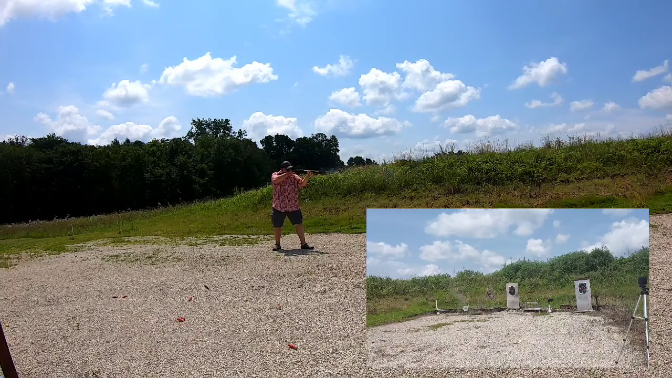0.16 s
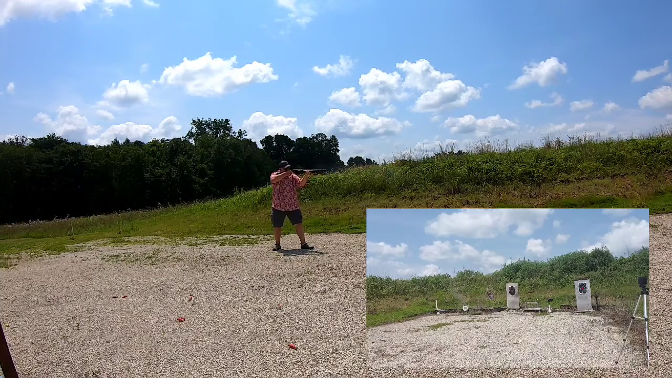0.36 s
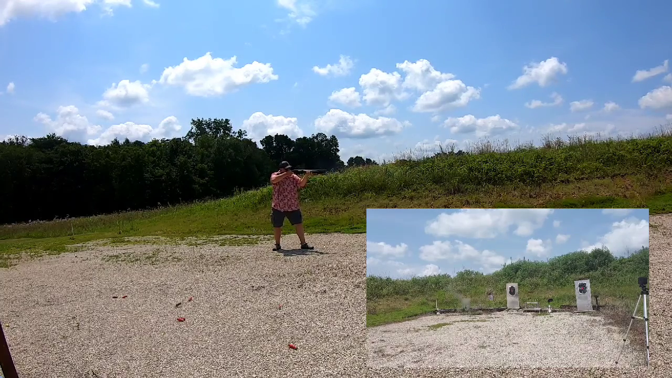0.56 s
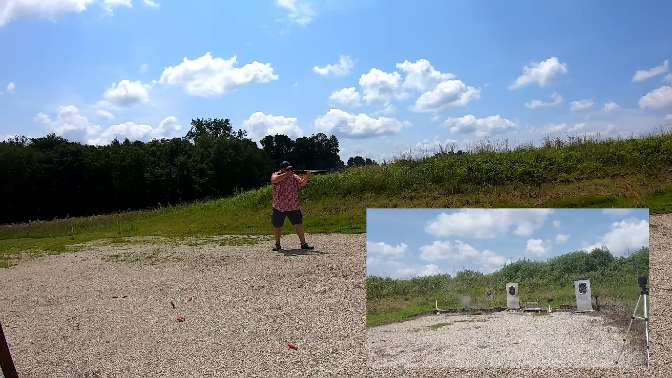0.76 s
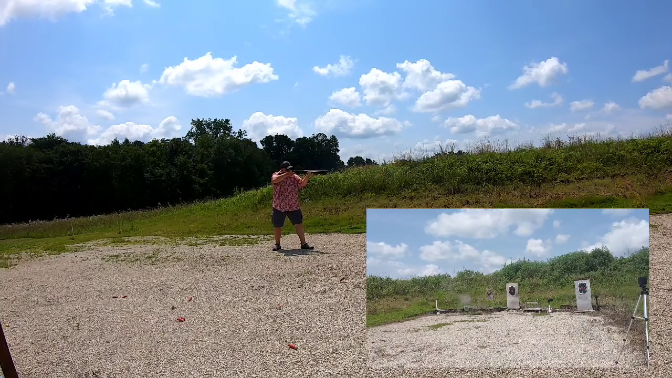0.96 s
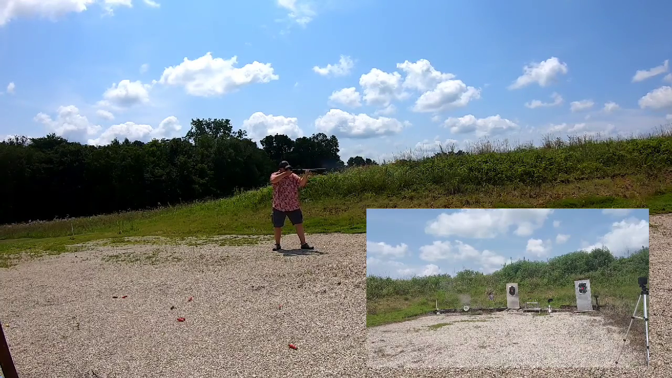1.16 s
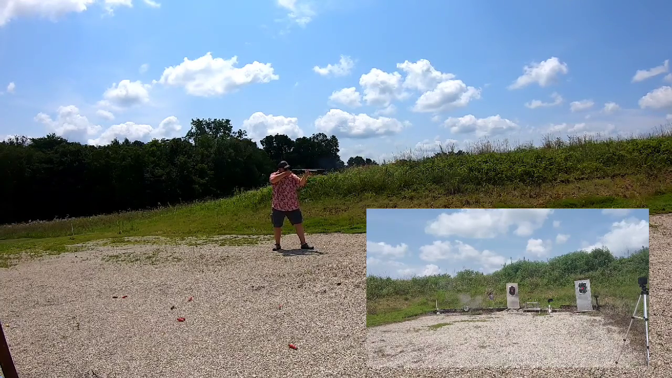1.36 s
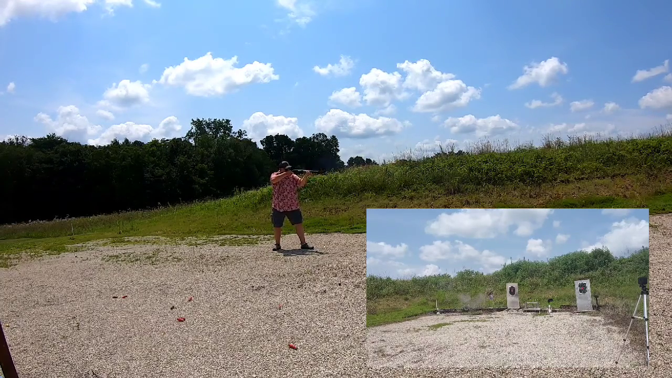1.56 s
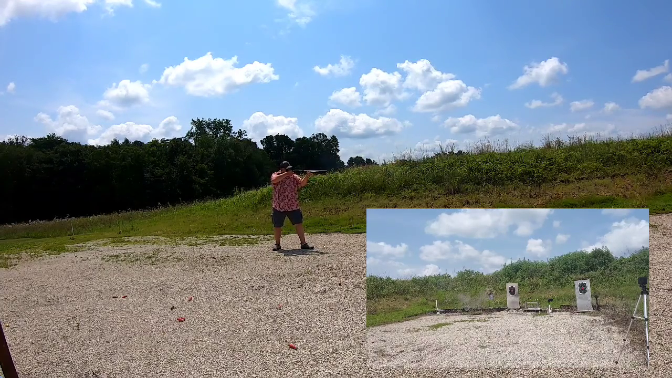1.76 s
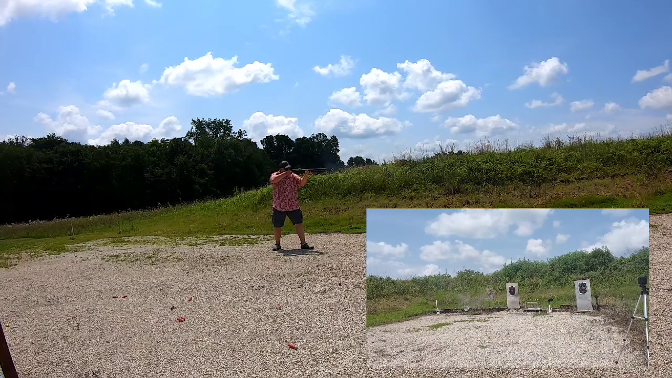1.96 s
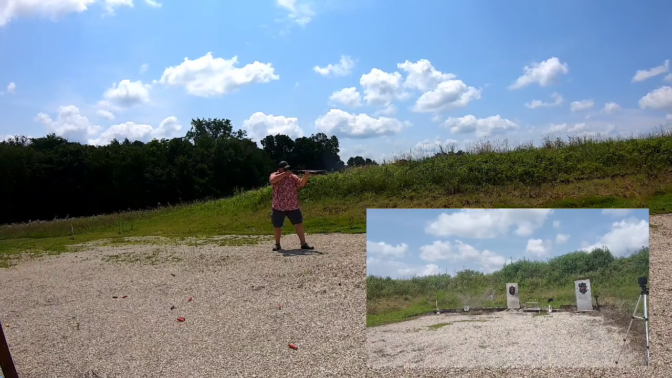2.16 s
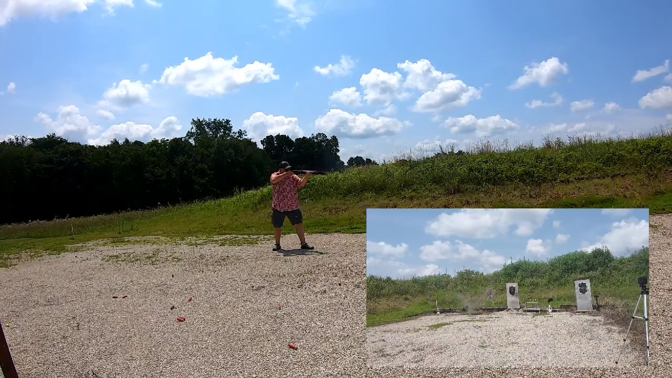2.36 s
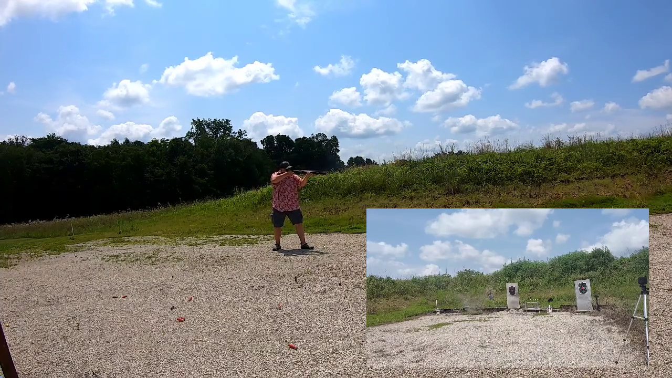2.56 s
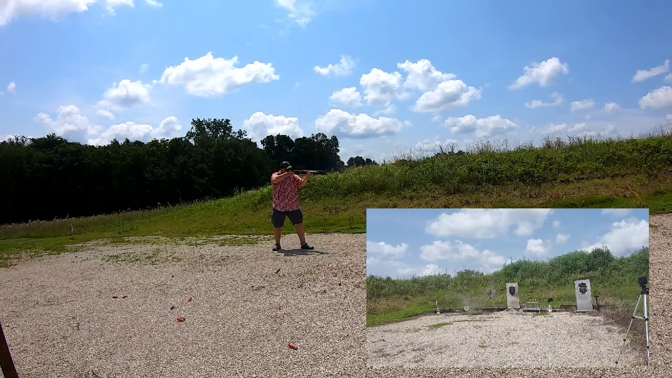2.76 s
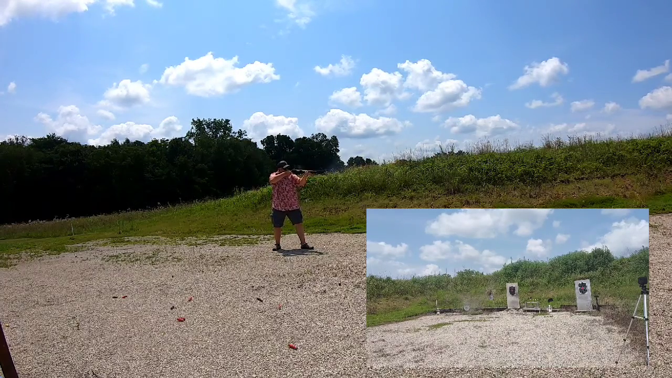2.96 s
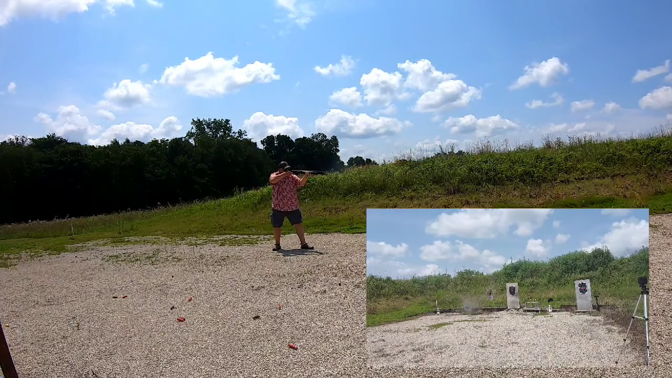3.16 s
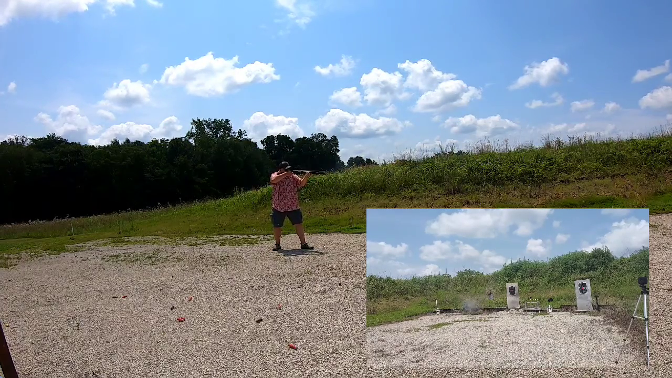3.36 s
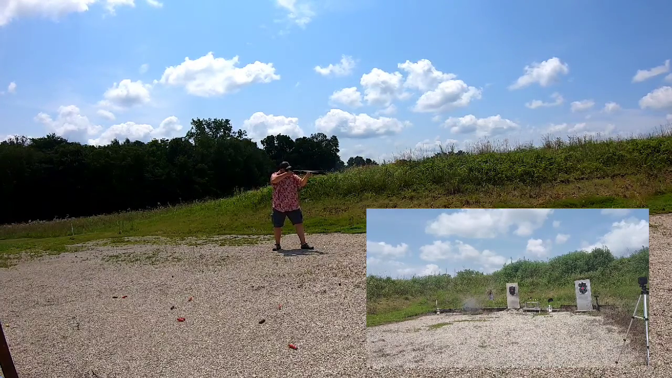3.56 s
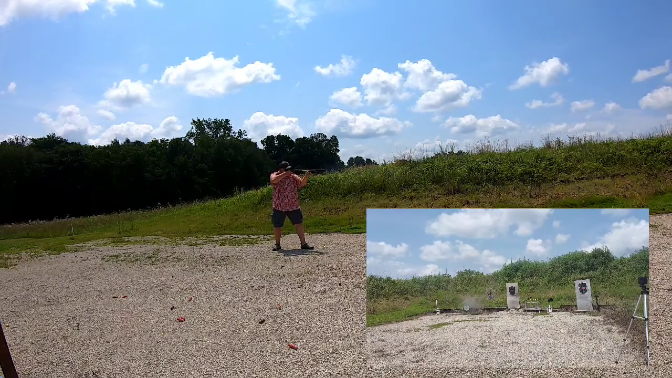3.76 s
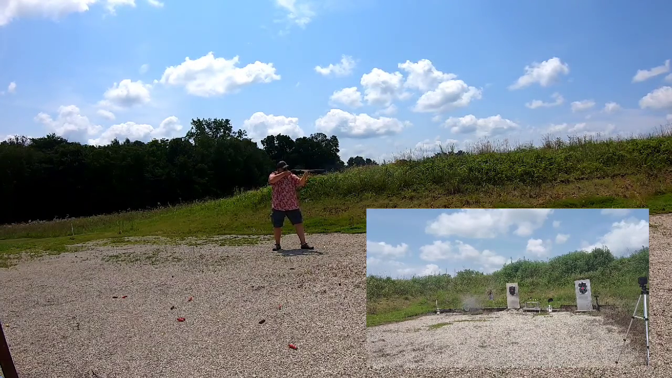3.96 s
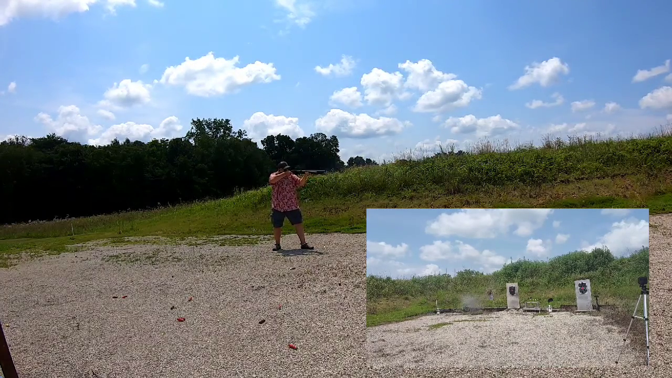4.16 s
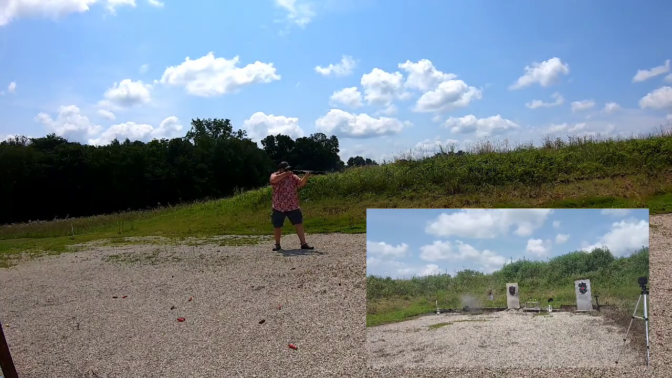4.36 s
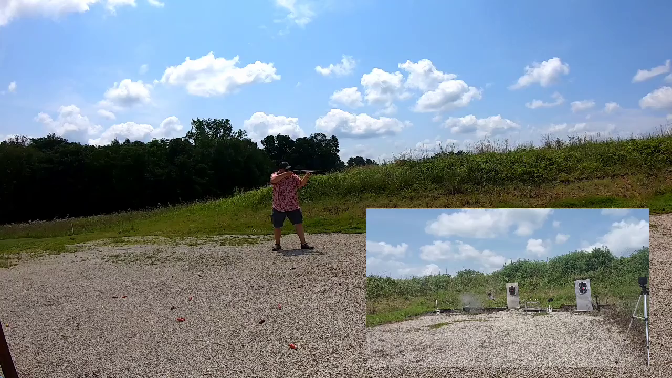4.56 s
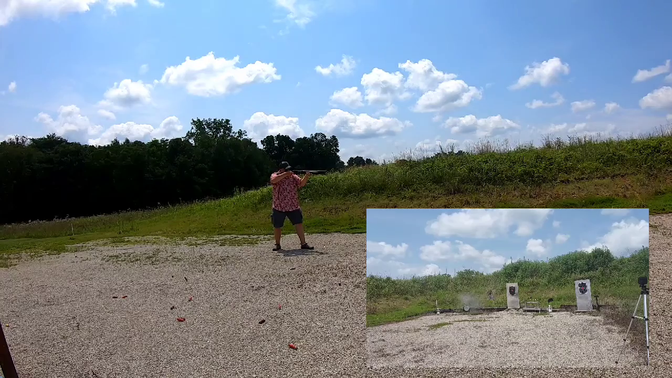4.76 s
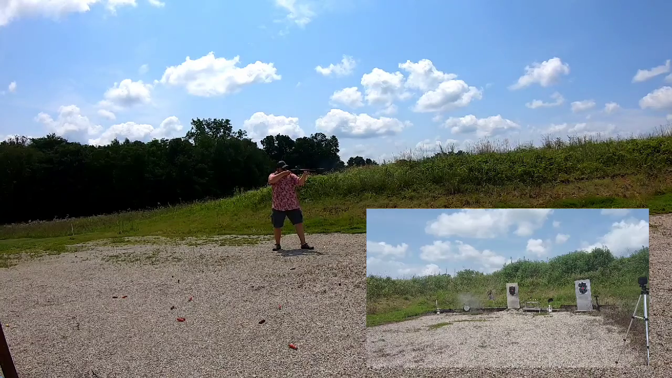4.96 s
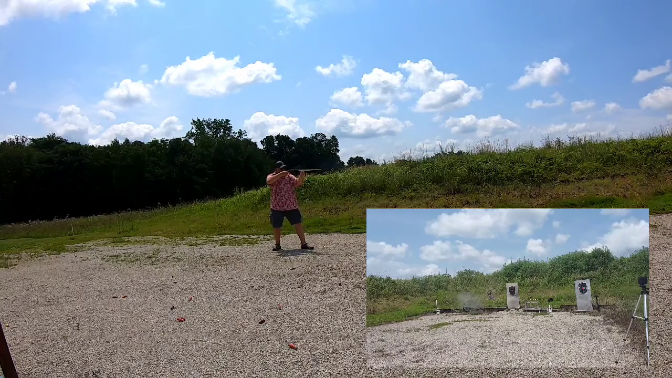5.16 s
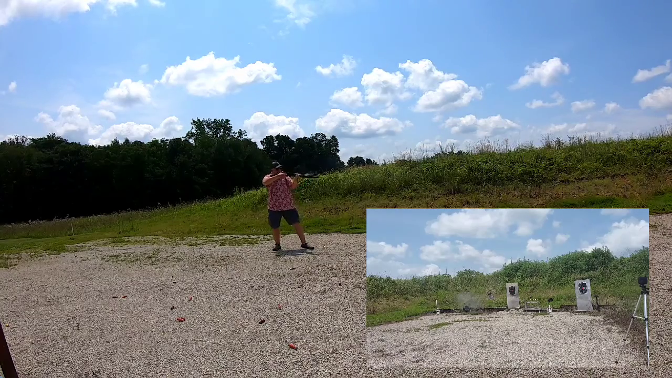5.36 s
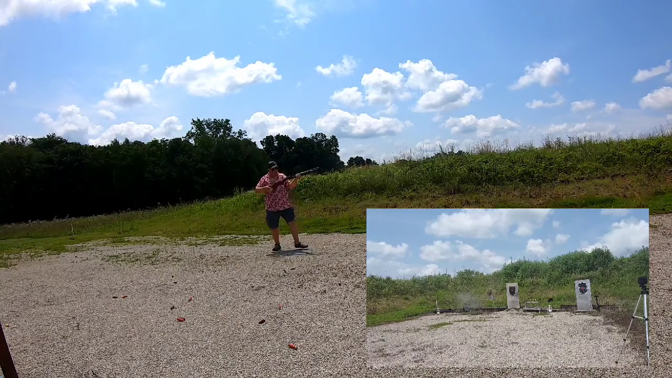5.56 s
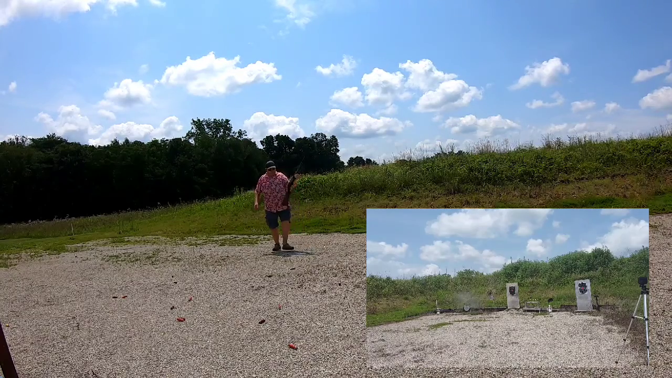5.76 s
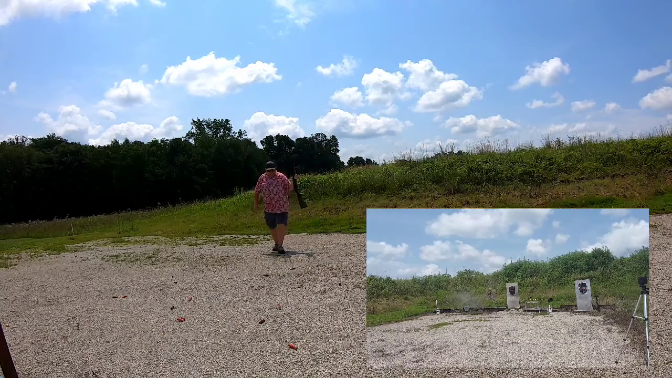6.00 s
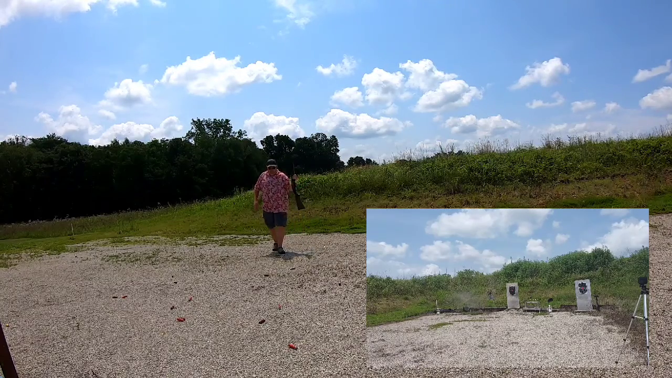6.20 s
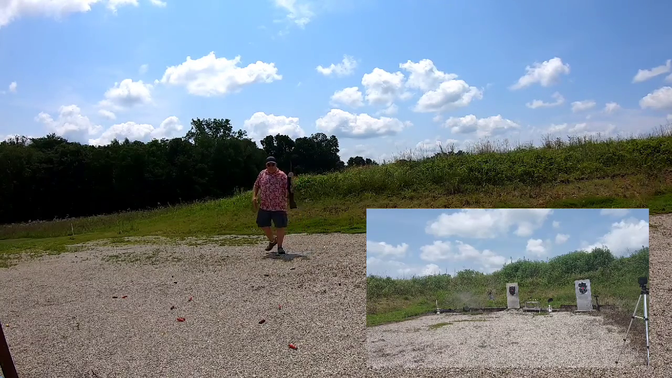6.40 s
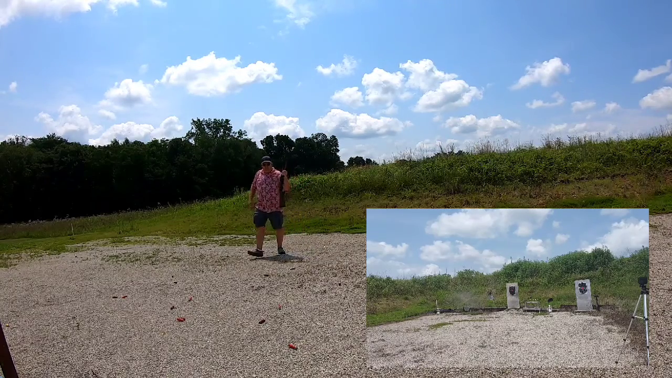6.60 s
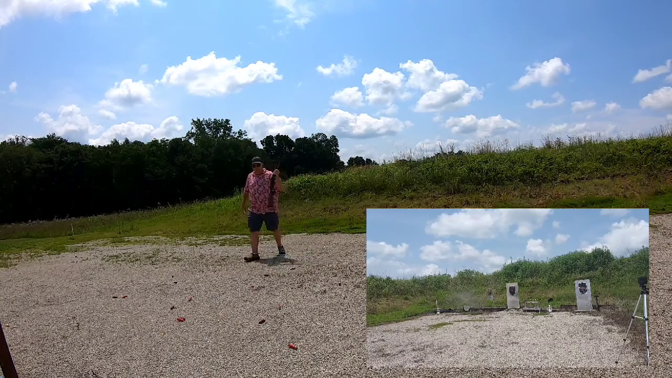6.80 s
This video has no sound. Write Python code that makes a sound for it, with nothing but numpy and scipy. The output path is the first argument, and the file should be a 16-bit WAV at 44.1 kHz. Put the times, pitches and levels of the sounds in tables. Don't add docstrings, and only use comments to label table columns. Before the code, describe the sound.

A semi-automatic shotgun fires six slow, spaced blasts outdoors, each clipping hard, echoing off berm and trees, with metallic action clatter and falling hulls.

```python
import sys
import numpy as np
from scipy import signal
from scipy.fft import rfft, irfft
from scipy.io import wavfile
from scipy.ndimage import uniform_filter1d

SR = 44100
rng = np.random.default_rng(int(sys.argv[2]) if len(sys.argv) > 2 else 0)


def log_audio(samples):
    frames = np.atleast_2d(samples).T
    limited = np.clip(frames, -1, 1)
    pcm = np.round(limited * 32767).astype(np.int16)
    wavfile.write(sys.argv[1], SR, pcm)


def gain_from_db(level_db):
    decades = np.asarray(level_db, float) / 20
    return 10 ** decades


N = 301644


def evened(x):
    return x / np.sqrt(np.mean(x ** 2) + 1e-20)


def read(points, hz):
    f, value = np.transpose(points)
    return np.interp(np.log(hz + 1), np.log(f + 1), value)


def coloured(x, points):
    hz = np.fft.rfftfreq(x.shape[-1], 1 / SR)
    return irfft(rfft(x) * gain_from_db(read(points, hz)), x.shape[-1])


def panned(x, db):
    return x * gain_from_db([[db / 2], [-db / 2]])


def add(mix, s, sound):
    at = round(s * SR)
    part = mix[:, max(at, 0):][:, :max(sound.shape[1] + min(at, 0), 0)]
    part += sound[:, max(-at, 0):][:, :part.shape[1]]


# pitch_hz [Hz], level_db [dB]
AIR_TONE = [(25, -9), (65, -1), (150, -8), (320, -33.5), (1400, -29.5), (4000, -36.5), (7000, -45),
            (10000, -48), (13500, -57)]


def still_air():
    a, b = rng.standard_normal((2, N))
    level_db = -67
    return gain_from_db(level_db) * evened(coloured(np.array([a + 0.32 * b, a - .4 * b]), AIR_TONE))


# start_s [s], level_db [dB]
SHOTS = [
    (-.204, 0),
    (.65689, 0),
    (1.55803, 0),
    (2.37671, 0),
    (3.29302, 0),
    (4.22979, 0),
    (5.29852, 0),
]
# pitch_hz [Hz], share [0 to 1]
REPEAT = [(300, 0.93), (1500, .85), (4000, 0.46)]


def scattered(curve, tone, same, side, loss, patchy_db, size, seconds):
    frames, hz = round(4 * seconds * SR / size), np.fft.rfftfreq(size, 1 / SR)
    t, mix = np.arange(frames) * size / 4 / SR, np.zeros((2, N))

    ground = rng.standard_normal((frames, len(hz), 5)).T
    patches = uniform_filter1d(ground[4], size=5, axis=0)
    patches = evened(uniform_filter1d(patches, size=5, axis=1))

    power = 0
    for at, db, rise, fall in curve:
        power = power + gain_from_db(db + np.minimum(rise * (t - at), fall * (at - t))) ** 2
    dulling = gain_from_db(read(loss, hz)[:, None] * np.maximum(t - curve[0][0], 0))
    shape = np.sqrt(power * (t > 0)) * dulling

    like = np.clip(read(same, hz), -1, 1)[:, None]
    repeat = np.clip(read(REPEAT, hz), 0, 1)[:, None]
    balance = gain_from_db(np.outer([.5, -.5], read(side, hz)))
    colour = (gain_from_db(read(tone, hz)) * balance)[..., None] * gain_from_db(patchy_db * patches)

    def back(v):
        return signal.istft(v, nperseg=size, noverlap=size * 3 // 4)[1]

    unit = None
    for s, db in SHOTS:
        fresh = rng.standard_normal((frames, len(hz), 4)).T
        a, b, c, d = repeat * ground[:4] + np.sqrt(1 - repeat ** 2) * fresh
        left = a + 1j * b
        right = like * left + np.sqrt(1 - like ** 2) * (c + 1j * d)
        z = colour * np.array([left, right])
        if unit is None:
            unit = np.std(back(z))
        add(mix, s, gain_from_db(db) * back(z * shape) / unit)
    return mix


# after_shot_s [s], level_db [dB], rise [dB per s], fall [dB per s]
NEAR = [(.004, -35, 9001.5, 495.5), (.055, -44, 198, 185), (.1, -48, 119, 480), (.15, -61, 99.5, 52),
        (.217, -48, 696, 218), (.288, -44.5, 541, 104)]
# pitch_hz [Hz], level_db [dB per Hz]
NEAR_TONE = [(240, -38.5), (400, -13.5), (1020, -7), (1820, -4), (2530, -6), (3840, -4.5), (6090, -13.5),
             (8700, -15.5), (12200, -34.5), (14000, -61)]
# pitch_hz [Hz], change [dB per s]
NEAR_THINNING = [(1100, -43), (2600, 0)]


def near_ground():
    same = [(500, 0.54), (6000, 0.13)]  # Hz, likeness of left and right
    side = [(400, -18.0), (1500, -0.5)]  # Hz, left-right dB
    return scattered(NEAR, NEAR_TONE, same, side, NEAR_THINNING, patchy_db=1.5, size=256, seconds=.6)


# after_shot_s [s], level_db [dB], rise [dB per s], fall [dB per s]
ROLL = [(.004, -31.5, 9000, 250), (.065, -38, 204, 260), (.13, -50, 297, 140), (.235, -48.5, 300, 270),
        (.42, -50, 25, 21)]
# pitch_hz [Hz], level_db [dB per Hz]
ROLL_TONE = [(12, -64), (20, -33), (38, -35.5), (53, -13), (102, 3.5), (182, 2.5), (217, -0.5), (431, -11),
             (500, -18.5), (650, -44.5), (1100, -120)]


def low_roll():
    flat = [(100, 0.00087), (10000, 0.0063)]
    same = [(100, 1.0), (400, 1.0)]
    return scattered(ROLL, ROLL_TONE, same, flat, flat, patchy_db=3.5, size=1024, seconds=2.2)


# after_shot_s [s], level_db [dB], rise [dB per s], fall [dB per s]
TREES = [
    (.217, -44, 1010, 330),
    (.345, -40.5, 205, 40.8),
    (.6, -52.5, 60, 13),
]
# pitch_hz [Hz], level_db [dB per Hz]
TREE_TONE = [(210, -43), (350, -17), (415, -17), (448, -15), (601, -12.5), (723, -5.5), (1020, -3),
             (3080, -6.5), (9370, -25.5), (13200, -33.5), (14000, -79)]
# pitch_hz [Hz], change [dB per s]
AIR_LOSS = [(500, 3.5), (2000, -10.5), (5000, -11), (12000, -22.5)]
# pitch_hz [Hz], likeness [-1 to 1]
TREE_SAME = [(60, 1), (180, 1.0), (530, 0.63), (1560, 0.69), (4620, 0.4), (13700, -0.48)]
# pitch_hz [Hz], left_right_db [dB]
TREE_SIDE = [(60, 1), (150, -4), (370, -4), (910, 8.5), (2240, 6.5), (5530, 0), (13700, 3.5)]


def tree_line():
    return scattered(TREES, TREE_TONE, TREE_SAME, TREE_SIDE, AIR_LOSS, patchy_db=2.8, size=256, seconds=2.2)


def ring(start, loudest, end, hz, db, side_db, glide=0):
    t = np.arange(start, end, 1 / SR)
    shape = np.sin(np.pi / 2 * np.interp(t, [start, loudest, end], [0, 1, 0])) ** 1.2
    waver = 1 + .3 * evened(uniform_filter1d(rng.standard_normal(len(t)), size=300))
    progress = (t - start) / (end - start)
    turns = np.cumsum(hz * (1 + glide * (progress + 0.21 * (waver - 1) / .3))) / SR
    return panned(gain_from_db(db) * np.sqrt(2) * shape * waver * np.sin(2 * np.pi * turns), side_db)


PARTS_HZ = (2290, 10960)


def loose_parts(s, count):
    rows = []
    low_hz, high_hz = PARTS_HZ
    for when, pitch, length, size in rng.random((count, 4)):
        start = s + 0.044 + 0.08 * when ** 1.2
        hz = low_hz * (high_hz / low_hz) ** pitch
        db = -52.5 - 12 * (when + pitch) + 6 * size
        rows.append((start, start + .005, start + .012 + .06 * length ** 2, hz, db, -6))
    return rows


def part_rings(modes, rings):
    rows = []
    for s, length, share, db in rings:
        for hz, mode_db, side_db in modes:
            rows.append((s, s + share * length, s + length, hz, db + mode_db, side_db))
    return rows


# pitch_hz [Hz], level_db [dB], left_right_db [dB]
CARRIER = [(5090, -2.5, -10), (8940, -19, -3.5), (10479, -30, -5), (12861, -26, -15)]
# start_s [s], length_s [s], share until loudest [0 to 1], level_db [dB]
CARRIER_RINGS = [(.01, 0.084, 0.34, -61), (0.712, 0.071, .2, -47.5), (2.443, 0.15, 0.43, -39),
                 (2.781, 0.11, 0.32, -64), (4.275, 0.046, .15, -47.5), (4.352, 0.092, .5, -63.5),
                 (6.471, 0.21, .1, -73)]


def carrier():
    return part_rings(CARRIER, CARRIER_RINGS)


def click(db, hz, side_db, rattle_db, hollow, t60):
    ms = np.arange(4000) * 1000 / SR
    knock = np.sin(2 * np.pi * hz * ms / 1000) * gain_from_db(-60 * ms / abs(hollow)) * np.minimum(ms / 0.24, 1)
    grit = evened(coloured(rng.standard_normal((2, len(ms))), NEAR_TONE))
    rattle = grit * gain_from_db(rattle_db - 60 * ms / abs(t60))
    return panned(gain_from_db(db - 5.5) * (knock + rattle), side_db)


# start_s [s], peak_db [dB], left_right_db [dB], rattle_db [dB re peak]
HULLS = [(0.5008, -38, -1, 2.5), (1.2454, -40.5, -4, 4), (1.3696, -43.5, -3, 0), (2.2942, -36, 3, -7),
         (3.025, -31.5, -2, -4), (3.9755, -45, -1, 4.5), (4.9247, -41, 3, 9), (5.9872, -43, 0, 3.5)]


def hulls():
    hollow_hz, hollow_ms, rattle_ms = 1280, 42, 12.7
    return [(s, db, hollow_hz, side_db, rattle_db, hollow_ms, rattle_ms)
            for s, db, side_db, rattle_db in HULLS]


# after_shot_ms [ms], level_db [dB], push_length_ms [ms]
FRONTS = [
    (-.1, 3.5, .42),
    (.28, -3, .15),
    (1.3, 1.5, .2),
    (1.72, -3, .18),
    (2.45, -6, .25),
]
# pitch_hz [Hz], level_db [dB]
BLAST = [(60, -13), (300, -5.5), (520, 5.5), (760, 8), (1100, 5.5), (2400, 7), (4000, 9), (6500, -11.5),
         (10000, -17), (14000, -31.5)]


def muzzle_fronts(ms):
    fronts = 0
    for at, level_db, length in FRONTS:
        a, b, c = rng.standard_normal(3)
        u = np.maximum(ms - at - 0.033 * a, 0) / (length * (1 + 0.13 * b))
        fronts = fronts - gain_from_db(level_db + 1.4 * c) * (u > 0) * (1 - u) * np.exp(-u)
    return panned(coloured(fronts, BLAST), -0.54)


# after_shot_ms [ms], level_db [dB], rise_ms [ms], time to fall 60 dB [ms], left_right_db [dB]
CRACK = (-1.2, -12, 1.3, 11, -.7)
SLAPS = [
    (36.8, -27, 0.45, 16, -6.5),
    (47.87, -23, 2.1, 13, -8.5),
]
# pitch_hz [Hz], level_db [dB per Hz]
SLAP_TONE = [(530, -32), (900, 0), (2200, -5), (4140, -10), (5990, -9.5), (7190, -15), (12900, -23.5),
             (14000, -43)]


def slap(ms, at, level_db, rise, t60, side_db):
    after = np.maximum(ms - at, 0)
    hiss = evened(coloured(rng.standard_normal((2, len(ms))), SLAP_TONE))
    if at < 0:
        hiss = hiss + .15 * hiss[::-1]
    fade_db = level_db - 60 * np.maximum(after - rise, 0) / t60
    return panned(hiss * np.minimum(after / rise, 1) ** 2 * gain_from_db(fade_db), side_db)


def swing(ms, db, hz):
    u = ms * hz / 1000
    return gain_from_db(db) * np.sin(2 * np.pi * u) * np.exp(-(u / 0.35) ** 2)


# after_shot_ms [ms], level_db [dB], pitch_hz [Hz, minus = rise first], left_right_db [dB]
REBOUND = [
    (5.3, -10, 125, 0),
    (11.5, -24, -52, 0),
]
# after_shot_ms [ms], left_right_db [dB]
SHEDS = [
    (40.7, -6),
    (46.6, -2),
]
BERM = [(54.8, -17, 125, 5), (57.5, -27, 52, 8), (58, -37, -45, -14)]
BANKS_MS = [60.5, 70.4, 75.2, 82, 86.5, 96.3, 103]


def slow_swings(ms):
    sheds = []
    for at, side_db in SHEDS:
        sheds.append((at, -16, 275, side_db))
        sheds.append((at + 3.2, -16 - 10, 275, side_db))
    banks = [(at, -23.5 - 0.33 * (at - BANKS_MS[0]), 180, 0) for at in BANKS_MS]
    sounds = []
    for at, level_db, hz, side_db in REBOUND + sheds + BERM + banks:
        a, b = rng.standard_normal(2)
        sounds.append(panned(swing(ms - at - .08 * a, level_db + .7 * b, hz), side_db))
    return sounds


# blocks ahead [count], then level_db at 150, 750 and 1600 Hz [dB]
LEAKS = [(1, -7, -8.5, -28), (2, -20, -19.5, -35.5), (3, -30.5, -35, -54), (4, -55, -41.5, -45.5)]


def early_leaks(direct):
    block_ms, leaks = 10.7, 0
    for blocks, low_db, mid_db, high_db in LEAKS:
        tone = [(150, low_db), (450, mid_db - 4.5), (750, mid_db),
                (1050, mid_db - 6.5), (1600, high_db), (9000, high_db + 5)]
        early = np.roll(coloured(direct, tone), -round(blocks * block_ms * SR / 1000), 1)
        leaks = leaks + (-1) ** blocks * early
    return leaks


def shot(db):
    ms = np.arange(8192) * 1000 / SR - 50
    fronts = muzzle_fronts(ms)
    crack = slap(ms, *CRACK)
    slaps = sum(slap(ms, *row) for row in SLAPS)
    swings = slow_swings(ms)
    direct = fronts + crack + swings[0]
    build_up = gain_from_db(-22.0) * np.sin(2 * np.pi * .52 * ms) * np.exp(-((ms + 4) / 5.3) ** 2)
    disagreement = build_up * np.array([[1], [-1]])
    return gain_from_db(db) * (fronts + crack + slaps + sum(swings) + disagreement + early_leaks(direct))


# start_s [s], length_s [s], pitch_hz [Hz], level_db [dB]
CHIMES = [(0.722, 0.053, 8615, -63), (0.733, .06, 11700, -71), (2.481, 0.094, 1191, -57.5),
          (3.41, .12, 11719, -70), (5.34, 0.067, 3790, -49), (5.378, 0.054, 2690, -64)]


def chimes():
    return [(s, s + 0.33 * length, s + length, hz, db, -10) for s, length, hz, db in CHIMES]


# start_s [s], peak_db [dB], pitch_hz [Hz], left_right_db [dB]
BOLT = [(0.7621, -30.5, 3770, -1), (0.7855, -27.5, 4400, -8), (0.7951, -27.5, 3150, -13),
        (1.656, -33, 2870, 3), (1.6915, -37.5, 3160, -22), (2.5799, -29.5, 2470, -14),
        (2.5994, -28.5, 1830, -12), (3.0505, -44, 2470, 2.0), (4.0194, -56, 1820, 0),
        (4.3225, -29.5, 3800, -12), (4.4644, -38, 3640, -6), (6.1844, -53, 1590, 5),
        (6.2314, -53.5, 1700, -8), (6.3963, -38, 3700, -1), (6.4646, -29, 2320, -11.5)]


def bolt():
    rattle_db, hollow_ms, rattle_ms = -5, 10.4, 71
    return [(*row, rattle_db, hollow_ms, rattle_ms) for row in BOLT]


# pitch_hz [Hz], level_db [dB], left_right_db [dB]
HANDLE = [(3120, -2.5, -15.5), (6860, -22, -13)]
# start_s [s], length_s [s], share until loudest [0 to 1], level_db [dB]
HANDLE_RINGS = [(.798, 0.071, 0.19, -47.5), (1.685, 0.078, .27, -57.5), (2.43, 0.18, .2, -60),
                (3.339, 0.13, 0.24, -58), (4.286, 0.092, 0.87, -52.5), (5.374, 0.093, 0.16, -55),
                (6.467, 0.24, 0.098, -66.5)]


def handle():
    return part_rings(HANDLE, HANDLE_RINGS)


# start_s [s], peak_db [dB], pitch_hz [Hz], left_right_db [dB]
HANDLING = [
    (5.188, -29.5, 1160, 13),
    (6.256, -30, 1070, 16),
    (6.319, -41.5, 1250, 8.5),
]


def mount_taps():
    rattle_db, hollow_ms, rattle_ms = -28, 13.3, 19
    return [(*row, rattle_db, hollow_ms, rattle_ms) for row in HANDLING]


# start_s [s], level_db [dB], pitch_hz [Hz]
STEP = (6.295, -43, 33)


def ground_step():
    return panned(swing(np.arange(4410) * 1000 / SR - 50, *STEP[1:]), 3.6)


# start_s, loudest_s, end_s [s], pitch_hz [Hz], level_db [dB], left_right_db [dB], glide [share of pitch]
SQUEAK = [
    (6.352, 6.368, 6.435, 3820, -61, -14.5, -0.044),
    (6.39, 6.406, 6.45, 7550, -86, -7, -0.018),
]


def swivel_squeak():
    return list(SQUEAK)


def scene():
    mix = still_air() + near_ground() + low_roll() + tree_line()
    for s, db in SHOTS:
        add(mix, s - .05, shot(db))
    parts = [row for s, _ in SHOTS for row in loose_parts(s, count=80)]
    for row in parts + carrier() + chimes() + handle() + swivel_squeak():
        add(mix, row[0], ring(*row))
    for s, *row in hulls() + bolt() + mount_taps():
        add(mix, s, click(*row))
    add(mix, STEP[0] - .05, ground_step())
    return mix


def starved(x):
    hz, t, z = signal.stft(x, SR, nperseg=512, noverlap=384)
    since = t - np.array([s for s, _ in SHOTS])[:, None]
    busy = np.exp(-np.where(since > -.03, np.maximum(since, 0), 9).min(0) / .22)
    frame, treble = np.arange(len(t)), np.clip((hz[:, None] - 2600) / 3200, 0, 1)
    wide = rng.random((30, len(t)))[(hz // 1100).astype(int)][:, (frame + 3) // 7]
    thin = rng.random((90, len(t)))[(hz // 345).astype(int)][:, frame // 16]
    dropped = (wide < .5 * busy * treble) | (thin < .1 * np.sqrt(treble))
    loud = uniform_filter1d(abs(z[0]) + abs(z[1]), size=3, axis=1) > gain_from_db(-58)
    keep = np.where(dropped & ~loud, gain_from_db(-16), 1)
    return signal.istft(z * keep, SR, nperseg=512, noverlap=384)[1][:, :N]


def top_cut(x):
    return signal.sosfilt(signal.butter(12, 14270, fs=SR, output="sos"), x)


def record(dry):
    clipped = np.clip(dry, -1, 1)
    edge = signal.firwin(255, 13300, window=("kaiser", 5), fs=SR)
    limited = signal.oaconvolve(starved(clipped), edge[None], "same")
    return top_cut(np.clip(limited, -1, 1))


dry = scene()
out = record(dry)
log_audio(out)
```